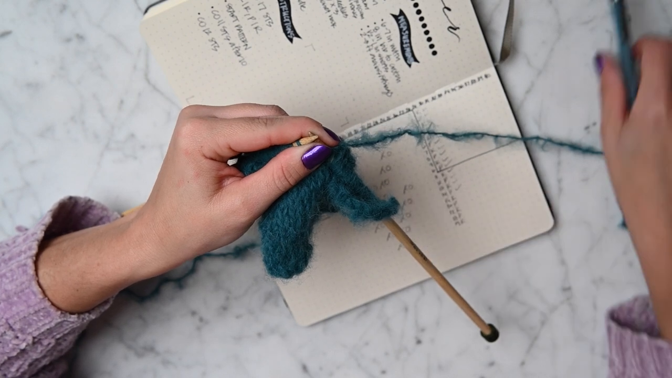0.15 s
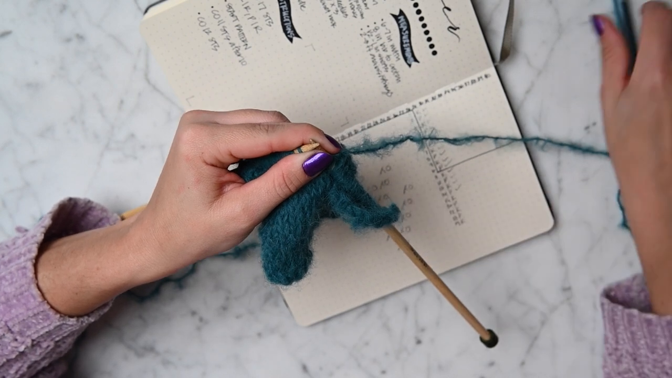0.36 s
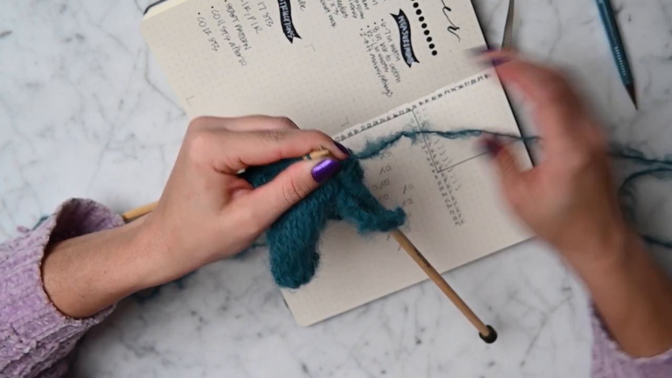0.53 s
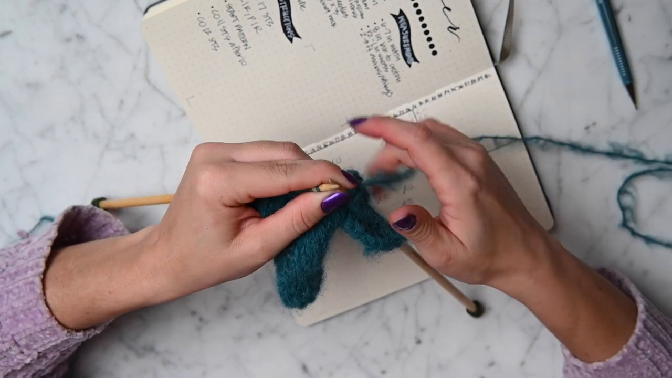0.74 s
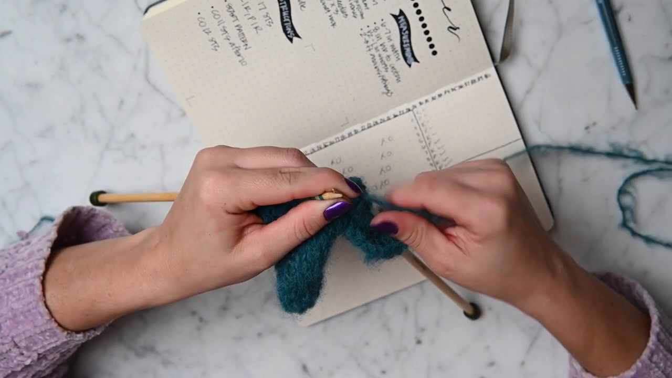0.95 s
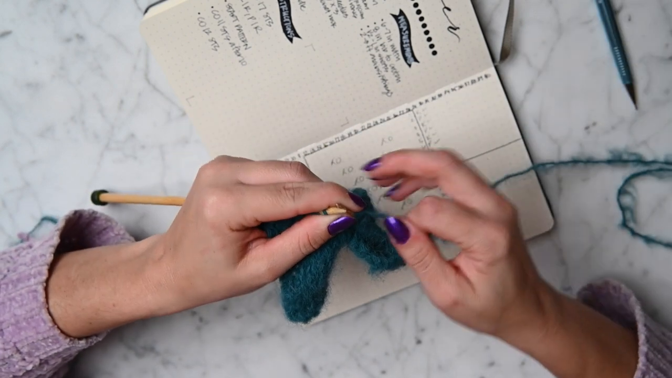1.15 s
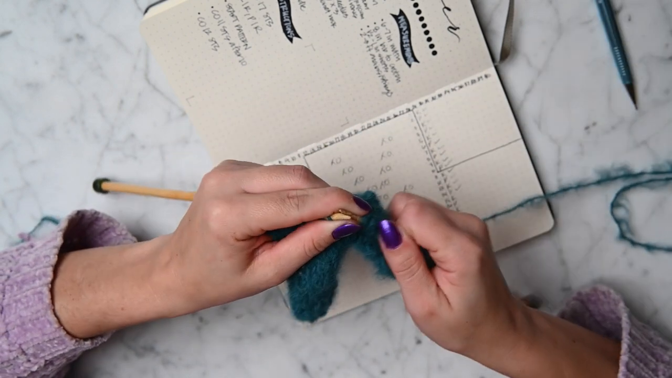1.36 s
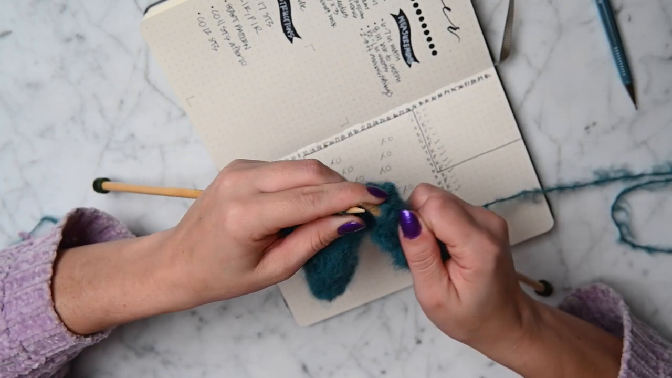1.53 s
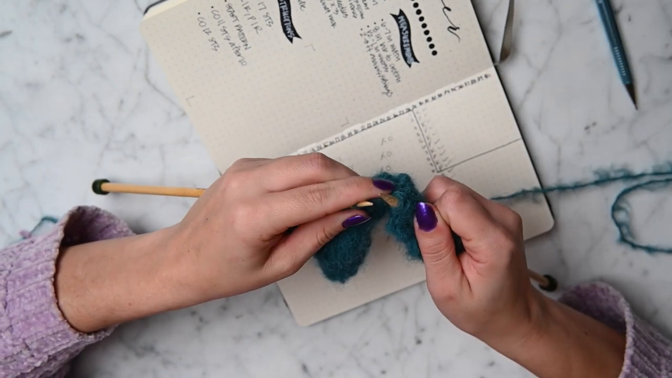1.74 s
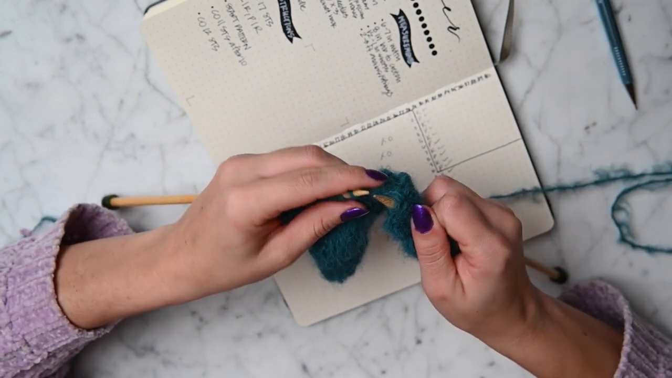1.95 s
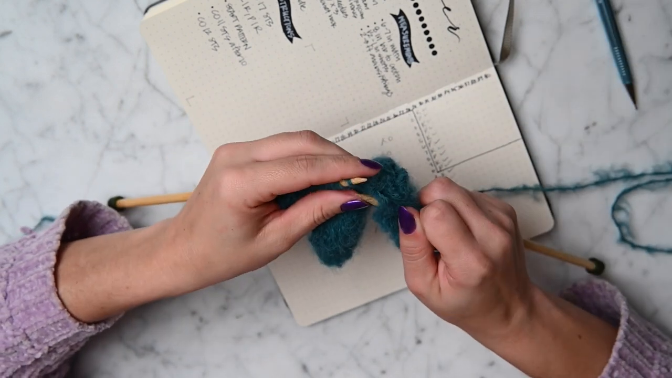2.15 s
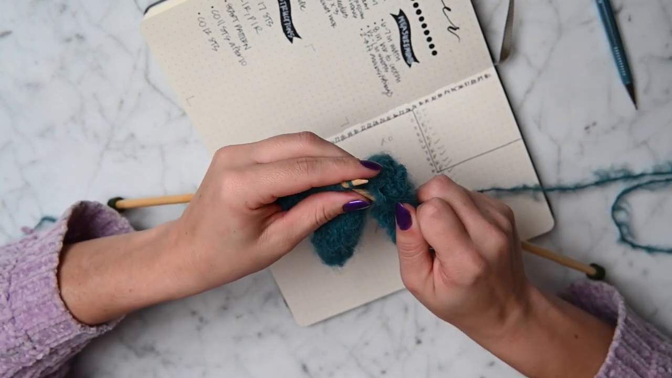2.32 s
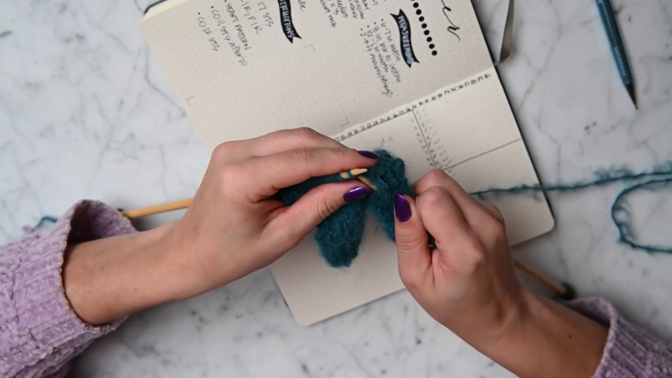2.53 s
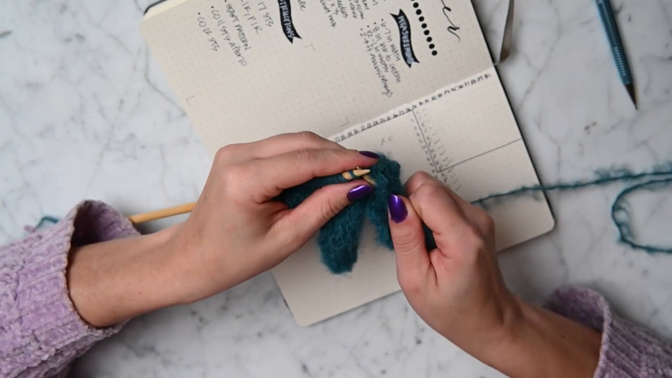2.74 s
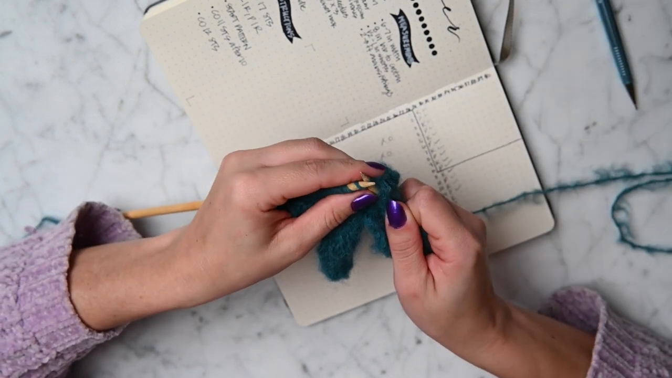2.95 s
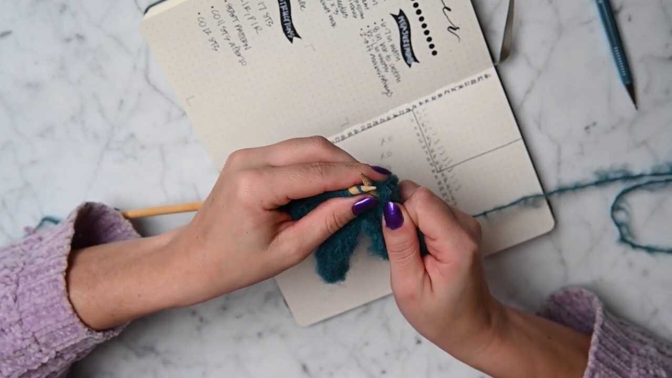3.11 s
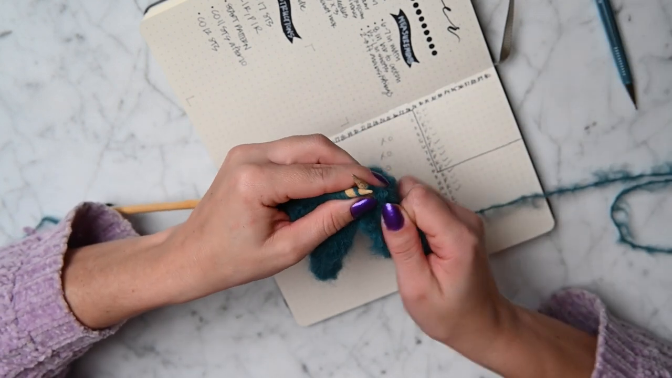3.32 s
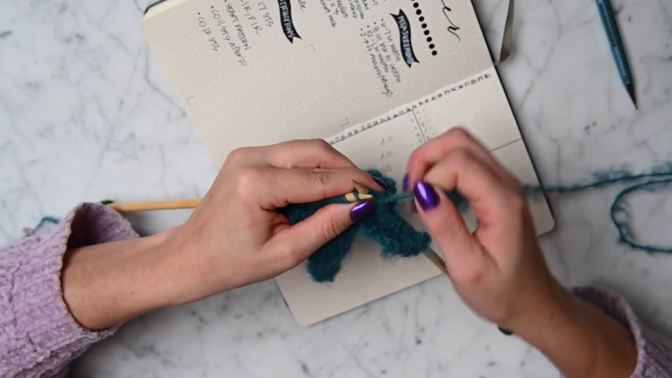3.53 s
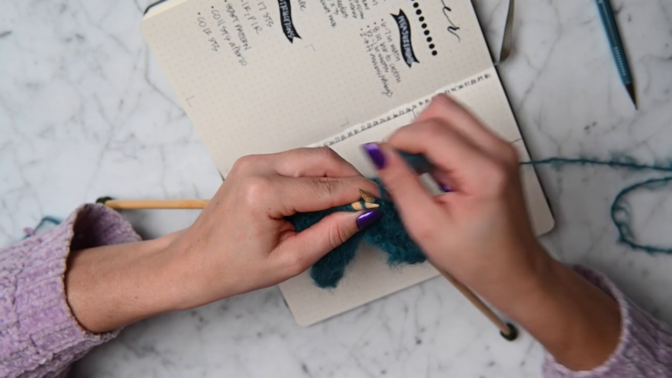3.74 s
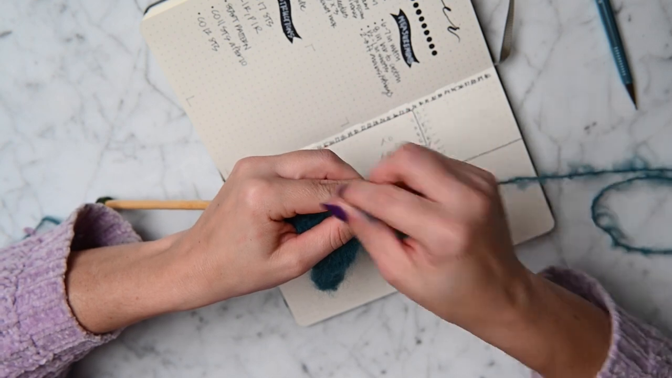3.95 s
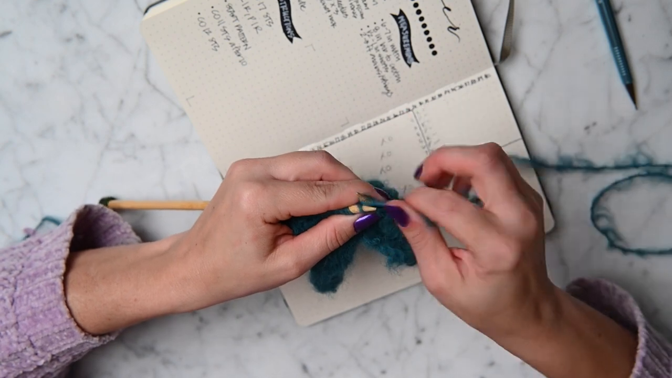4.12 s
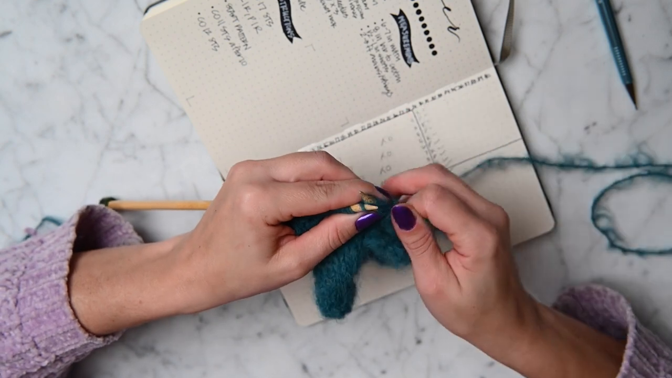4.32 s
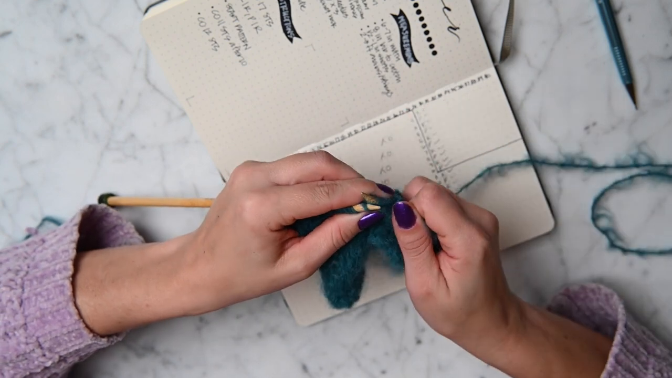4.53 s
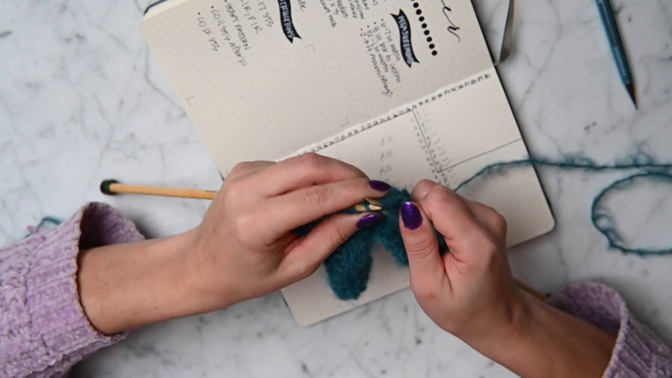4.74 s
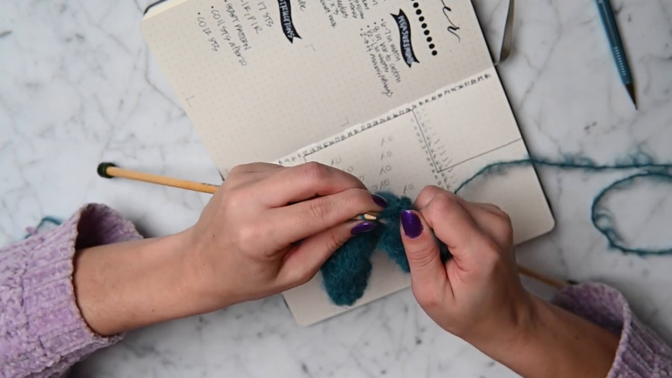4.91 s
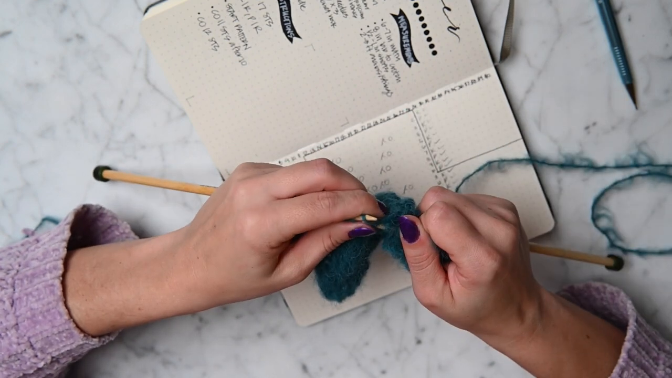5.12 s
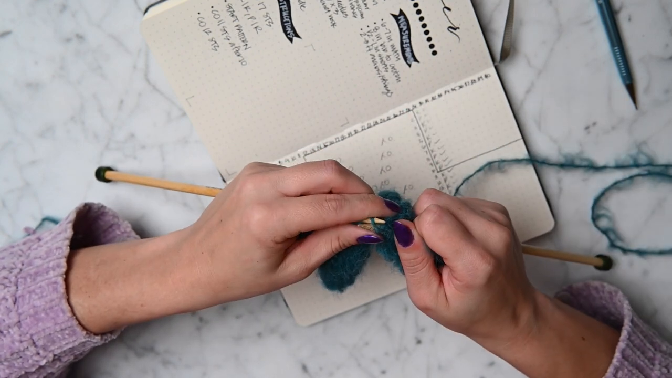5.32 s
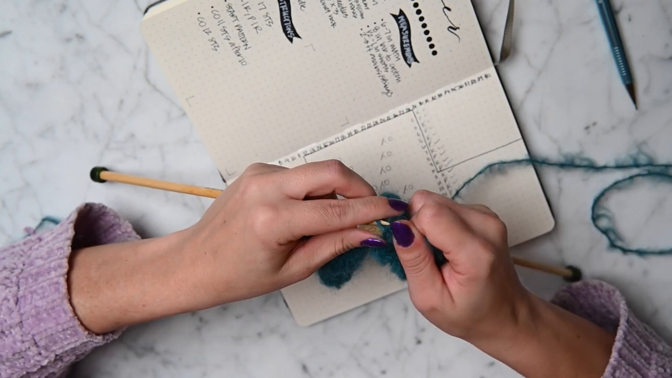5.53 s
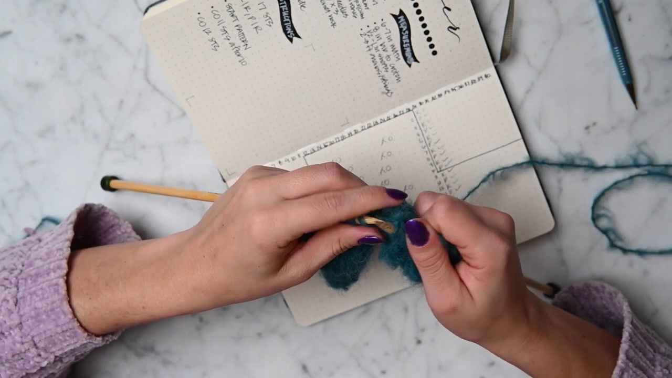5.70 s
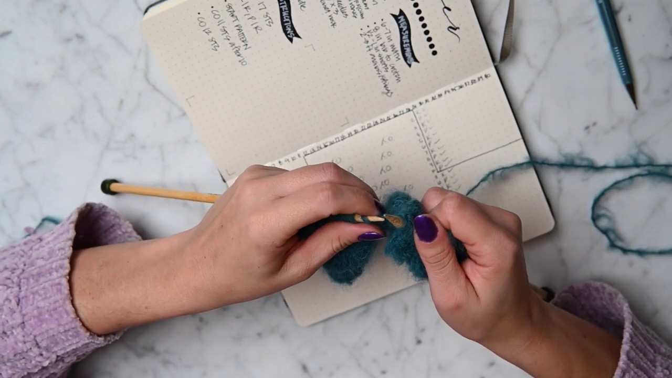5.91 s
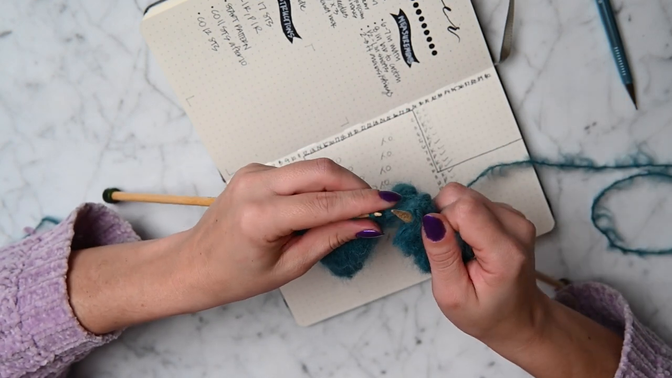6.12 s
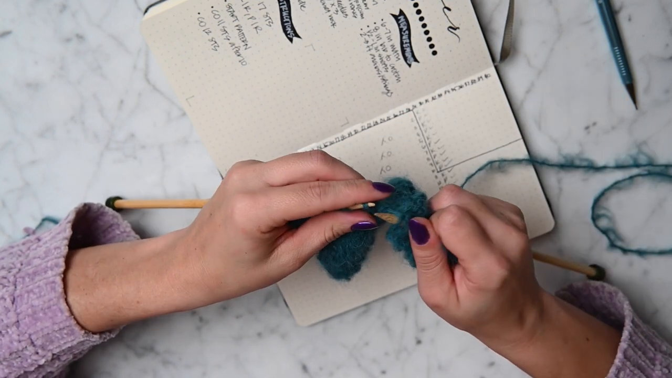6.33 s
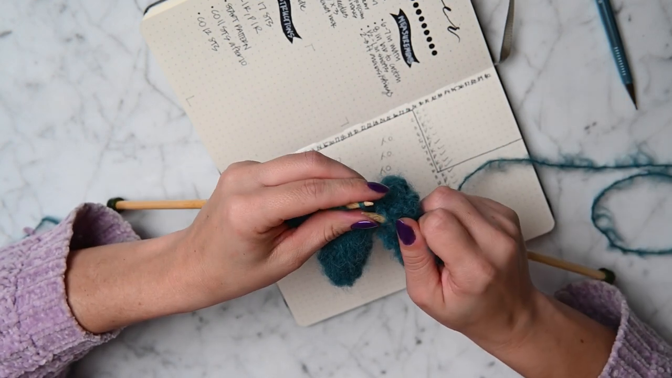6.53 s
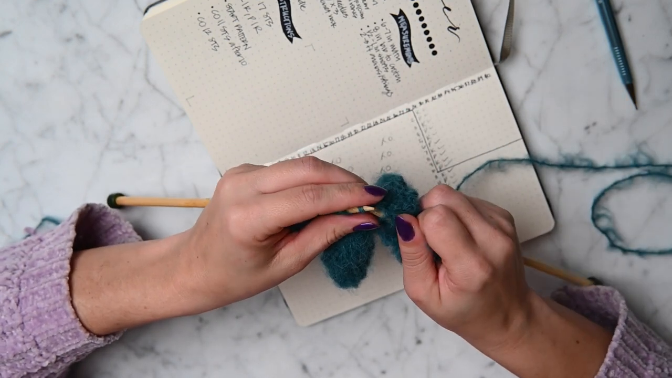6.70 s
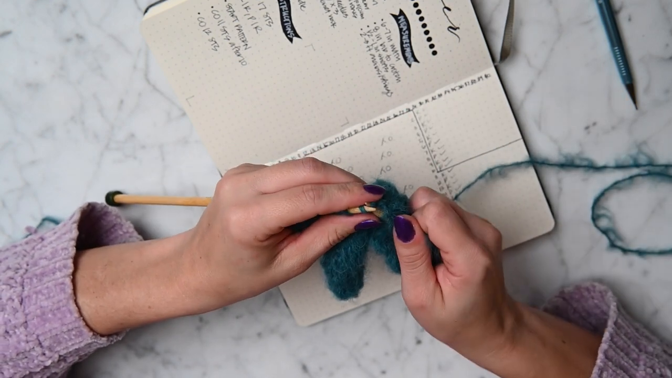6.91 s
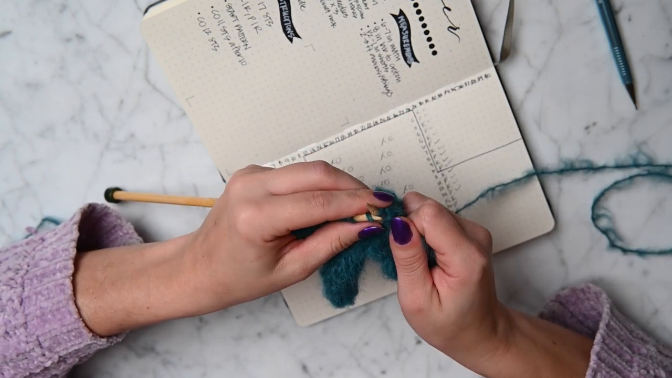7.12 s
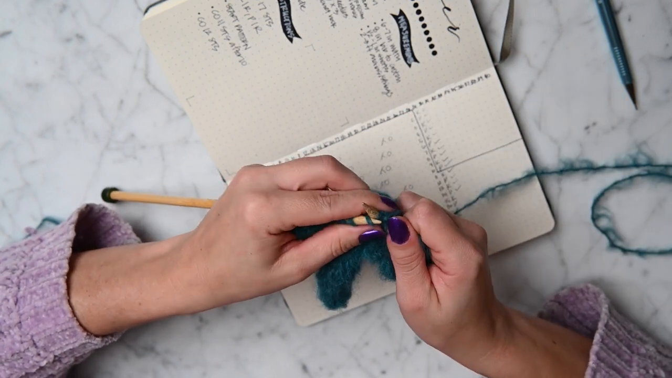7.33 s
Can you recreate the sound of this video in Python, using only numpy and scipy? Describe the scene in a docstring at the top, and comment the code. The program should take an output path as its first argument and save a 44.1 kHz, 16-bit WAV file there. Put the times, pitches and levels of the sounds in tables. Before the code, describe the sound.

Close, centred view of handwork at a table. First a pen clatters down, by far the loudest event, bouncing and chattering to rest within a fraction of a second. Then come isolated, small, dry wooden needle clicks with long gaps, some ringing slightly on the tabletop. Barely audible grainy wool hiss, tiny fibre snaps and soft cloth movement fill in. Steady faint hum, slightly wide airy hiss and gentle room reverberation surround everything.

```python
"""Knitting at a table in a quiet room. First a pen ticks and rustles in the fingers.
It is dropped on the table, and its knocks and a fading chatter of tiny touches ring barrel and table top.
Then wooden needles click as their ends knock on the table, each blow a crack plus ringing tones.
Between the clicks, grainy noise makes wool slide over the tips, a sleeve brush by and fabric rub.
Behind it all lie the steady and wavering tones of an appliance, soft air noise and the room's echo."""
import sys
import numpy as np
from scipy import signal
from scipy.fft import rfft, irfft
from scipy.io import wavfile

SR = 44100
rng = np.random.default_rng(int(sys.argv[2]) if len(sys.argv) > 2 else 0)


def waveform_to_disk(signal):
    """Save audio, clipped to [-1, 1], as 16-bit WAV at the path in sys.argv[1]."""
    frames = np.transpose(np.atleast_2d(signal))
    scaled = np.clip(frames, -1, 1) * 32767
    samples = np.round(scaled).astype(np.int16)
    wavfile.write(sys.argv[1], SR, samples)


N = 324576
TIME = np.arange(N) / SR

# Needle clicks. Each row: start in seconds, nominal peak in dB, table share in dB, main ring in Hz,
# its lift in dB, second ring in Hz, its lift in dB, table ring in Hz, its lift in dB.
NEEDLE_CLICKS = [(0.8156, -35.5, 0, 2310, 4, 3500, 5, 930, 8),
                 (0.9210, -38.5, 7.5, 2080, 11, 6800, 14, 1140, 3),
                 (1.8024, -33.5, 5, 2490, 5, 5830, 15, 490, 2), (2.141, -40, -1, 2700, 0, 5000, 4, 600, -1),
                 (2.9465, -34.5, 1, 3500, 7.5, 2050, -2, 1220, 6),
                 (3.3903, -48.5, -4, 1800, 7, 3000, 1, 800, -1), (3.3964, -49, 3, 2000, 2, 3000, 1, 800, 2),
                 (3.6389, -20.5, -1.5, 3400, 10.5, 7500, 4.5, 700, 8),
                 (3.6461, -45, -12, 7000, 4, 3400, 1, 700, 1),
                 (3.6511, -33, 3, 3420, 2, 7000, -5, 720, -10),
                 (3.6543, -39.5, -9, 7600, 6, 3420, 3, 720, -2),
                 (4.7259, -34, 1, 3400, 8, 5000, 6, 620, -3),
                 (5.5711, -27, 8, 2560, 9, 5100, 11.5, 660, 3.5),
                 (5.7289, -37, 5, 3300, 14, 4700, 14, 930, 13),
                 (6.2550, -46.5, 4, 1900, 6, 3400, 9, 603, 6), (6.9433, -33, 2, 2490, 5, 3950, 9, 690, 4)]
# Wooden needle tones. Each row: pitch in Hz, height of the resonance in dB, time to fade by 60 dB in seconds.
NEEDLE_TONES = [(1720, 8, 0.04), (2100, 14.5, 0.04), (2490, 15, 0.035), (2870, 10, 0.03), (3460, 15, 0.022),
                (3930, 8, 0.03), (4610, 9, 0.022), (5010, 6.5, 0.02), (5330, 6.5, 0.018), (5870, 5, 0.012),
                (6730, 10, 0.007), (7520, 12, 0.008)]
# Crack of a needle contact. Each row: frequency in Hz, relative level in dB per Hz.
NEEDLE_CRACK_SPECTRUM = [(120, -20), (280, -11), (450, 8), (1100, 0.5), (2500, 3.5), (5000, 1),
                         (8000, -2.5), (11000, -13), (16000, -18)]
# A harder click is a shorter contact and so brighter; a knock of the blunt knob on the table is duller.
USUAL_CLICK_DB, USUAL_BRIGHT_HZ = -32.5, 5500
PEAK_DB_PER_OCTAVE = 12    # dB of peak that raise the brightness by an octave
TABLE_DB_PER_OCTAVE = 7.5  # dB of table share that lower it by an octave

# The pen lands on one end, falls flat and rocks from end to end. Each row: start in seconds, nominal peak
# in dB, brightness in Hz, table share in dB, main ring in Hz, its lift in dB, second ring in Hz,
# its lift in dB, table ring in Hz, its lift in dB.
PEN_KNOCKS = [(0.3734, -26, 700, 8, 2000, 0, 1700, 0, 400, 3),
              (0.3746, -17.5, 14000, 1, 2920, 14.5, 4170, -17, 1340, 7),
              (0.3818, -24, 15000, -7, 11800, 1, 9300, 12, 480, 3),
              (0.3998, -37, 15000, -8, 7200, 15, 9300, 14, 1340, 2),
              (0.4146, -17, 4500, 12.5, 2480, 13, 3500, 2, 480, 2.5),
              (0.4156, -6.5, 5800, 4, 2500, 10.5, 4650, 4.5, 920, 8.5),
              (0.4222, -19, 12000, 12, 11800, 8, 4500, 10, 690, 13.5),
              (0.4271, -18.5, 15000, -4, 3650, 8, 11800, 11, 700, -9),
              (0.4294, -17.5, 7000, 7.5, 3700, 14, 2700, 0, 1340, 11),
              (0.4492, -21.5, 7000, 3, 1700, 22, 2340, -1, 1340, 5),
              (0.4659, -24.5, 9000, 5.5, 5200, 2, 7200, 8, 500, 9),
              (0.4815, -28.5, 9000, -2, 2330, 3, 3450, -5, 600, 3),
              (0.5062, -32, 12000, -5, 3500, 13, 2300, 3, 1250, 6),
              (0.5170, -32.5, 9000, -11, 5700, 17, 2300, 9, 920, 4)]
# Pen barrel tones. Each row: pitch in Hz, height of the resonance in dB, time to fade by 60 dB in seconds.
PEN_TONES = [(1680, 7, 0.035), (2300, 5, 0.02), (2484, 11, 0.022), (2700, 6, 0.014), (2900, 10, 0.016),
             (3450, 13, 0.028), (3700, 14, 0.016), (4490, 13, 0.014), (5250, 12, 0.014), (5700, -1, 0.04),
             (7190, 9, 0.025), (9250, 12, 0.035), (11750, 16, 0.016), (12400, 11, 0.008)]
# Crack of a pen contact. Each row: frequency in Hz, relative level in dB per Hz.
PEN_CRACK_SPECTRUM = [(70, -25), (195, -15), (245, 4.5), (450, 2.5), (1000, -3), (1800, 1), (2800, -5),
                      (5000, -5.5), (8000, -4.5), (12000, -1.5), (16000, -8)]
# Table top tones, rung by every blow. Each row: pitch in Hz, height of the resonance in dB,
# time to fade by 60 dB in seconds.
TABLE_TONES = [(243, 5, 0.16), (285, 1, 0.08), (325, 0, 0.07), (403, 0, 0.07), (485, 10, 0.1),
               (510, 5, 0.12), (625, 0, 0.06), (680, 12, 0.08), (807, 5, 0.09), (922, 10.5, 0.075),
               (1060, 3, 0.04), (1230, 7, 0.08), (1342, 13.5, 0.18), (1678, 5, 0.06)]
# The pen chatters once it lies flat: a quick rise, a steady fade, a stop as it comes to rest.
CHATTER_START_S, CHATTER_ATTACK_S, CHATTER_HOLD_S, CHATTER_RELEASE_S = 0.416, 0.0057, 0.13, 0.012
CHATTER_DB, CHATTER_FADE_DB_PER_S = -35.5, 183
# Small ticks of the pen in the hand. Each row: start in seconds, peak in dB, pitch in Hz.
PEN_TICKS = [(0.017, -47, 2530), (0.0415, -49, 14900)]
TICK_T60_S = 0.022  # time to fade by 60 dB
# Fingers shift their grip on the pen. Each row: middle in seconds, length in seconds, level in dB.
# All lengths of rubbing strokes run between the points about 4 dB below the middle.
GRIP_SHIFTS = [(0.108, 0.0089, -70), (0.17, 0.37, -63.5)]
# Rustle of the fingers. Each row: frequency in Hz, relative level in dB per Hz.
FINGER_SPECTRUM = [(250, -2), (650, 7.5), (1300, -7), (2600, -4.5), (5000, -12.5), (9000, -17),
                   (15000, -24)]

# A single loop is drawn over a tip. Each row: middle in seconds, length in seconds, nominal level in dB.
LOOP_SLIDES = [(4.662, 0.053, -64.5), (5.027, 0.018, -59.5), (5.227, 0.072, -67.5), (5.68, 0.063, -68),
               (7.265, 0.033, -64.5)]
# Stitches are pushed along the needle in an even run of short shoves.
SHOVE_START_S, SHOVE_EVERY_S, SHOVE_LENGTH_S, SHOVE_DB = 2.70, 0.177, 0.073, -66
# Fibres snapping off a tip. Each row: start in seconds, nominal peak in dB.
FIBRE_SNAPS = [(2.764, -43.5), (3.201, -48), (3.39, -44.5), (5.023, -47), (5.6876, -39)]
# Hiss of wool on wood. Each row: frequency in Hz, relative level in dB per Hz.
WOOL_SPECTRUM = [(1000, -39), (3000, -12.5), (5500, -15), (7000, -4), (8400, 0.5), (10000, -5.5),
                 (13000, -8), (16000, -12)]
# The sleeve brushes as the arm moves. Each row: middle in seconds, length in seconds, level in dB.
SLEEVE_BRUSHES = [(3.41, 0.048, -69), (3.82, 0.13, -64.5), (4.12, 0.16, -69.5)]
# Brushing cloth. Each row: frequency in Hz, relative level in dB per Hz.
SLEEVE_SPECTRUM = [(300, -23), (700, -10), (1300, -7), (1850, 3.5), (2400, -11), (3600, -9), (6000, -13),
                   (12000, -32)]
# The knitted piece rubs as it is turned. Each row: middle in seconds, length in seconds, level in dB.
FABRIC_TURNS = [(2.08, 0.25, -64), (4.6, 0.57, -65), (6.9, 0.18, -71)]
# Dull rub of the knitted piece. Each row: frequency in Hz, relative level in dB per Hz.
FABRIC_SPECTRUM = [(200, -35), (400, -9), (560, -4.5), (800, -15.5), (1500, -24), (5000, -31)]

# Appliance tones. Each row: pitch in Hz, level in dB rms, wavering share from 0 to 1, waver rate in Hz.
HUM_TONES = [(58.5, -80.5, 0.6, 4.6), (102, -79, 0, 2), (120, -76.5, 0.1, 3.7), (266, -74.5, 0.1, 4.6),
             (404, -69.5, 0.65, 3), (210, -78, 1, 6.1), (388, -74, 1, 9), (431, -71, 1, 8),
             (1211, -82, 1, 3.9)]
# Air noise of the room and microphone hiss. Each row: frequency in Hz, relative level in dB per Hz.
AIR_SPECTRUM = [(25, -12), (45, -30), (85, -19), (150, -6), (240, -2), (310, -2), (390, 3), (490, -0.5),
                (620, -4.5), (1000, -10), (1900, -13), (3500, -16), (9000, -16), (16000, -18.5)]
AIR_DB = -60.5  # rms of the part shared by left and right
# Spread of the air noise. Each row: frequency in Hz, level of the left-right difference part
# against the shared part in dB.
AIR_WIDTH = [(60, -6), (300, -24), (1000, -9.5), (3000, -4), (8000, -4), (15000, -3.5)]
# How long the room rings. Each row: frequency in Hz, time to fade by 60 dB in seconds.
ROOM_FADE = [(200, 0.7), (1000, 0.9), (3000, 0.42), (7000, 0.58), (14000, 0.37)]
CUTOFF_HZ = 16000


def needle_contacts():
    """The harder a needle hits, the brighter the click; the more it is a knock on the table, the duller."""
    contacts = []
    for s, peak_db, table_db, *rings in NEEDLE_CLICKS:
        octaves = (peak_db - USUAL_CLICK_DB) / PEAK_DB_PER_OCTAVE - table_db / TABLE_DB_PER_OCTAVE
        contacts.append((s, peak_db, USUAL_BRIGHT_HZ * 2 ** octaves, table_db, *rings))
    return contacts


def needles():
    """Wooden needles click: each contact rings the needle and the table top."""
    return blows(needle_contacts(), NEEDLE_TONES, NEEDLE_CRACK_SPECTRUM, grit_db=6.0, grit_t60=0.053,
                 travel_s=0.00035, round_trip_s=0.0006, reflected=0.56, crest_db=12.0)


def pen_drop():
    """The falling pen knocks on the table: each contact rings the barrel and the table top."""
    return blows(PEN_KNOCKS, PEN_TONES, PEN_CRACK_SPECTRUM, grit_db=6.5, grit_t60=0.03,
                 travel_s=0.00025, round_trip_s=0.000403, reflected=0.4, crest_db=12.5)


def blows(rows, tones, crack, grit_db, grit_t60, travel_s, round_trip_s, reflected, crest_db):
    """Each blow cracks and rings both the object and the table; a softer contact is duller."""
    out, t = np.zeros(N), TIME[:SR // 3]
    click = pulse(crack, len(t))
    for (s, peak_db, bright_hz, table_db, ring_hz, ring_db, second_hz, second_db,
         table_hz, table_lift_db) in rows:
        # grit: countless weak tones, too dense to tell apart
        fading_noise = rng.standard_normal(len(t)) * dying(t, grit_t60)
        grit = rms_one(signal.fftconvolve(click, fading_noise)[:len(t)])
        grit *= from_db(grit_db) * np.std(click)
        body = ringing(tones, t, scatter_db=0.5, favoured=[(ring_hz, ring_db), (second_hz, second_db)])
        table_ring = ringing(TABLE_TONES, t, scatter_db=1.0, favoured=[(table_hz, table_lift_db)])
        table = signal.fftconvolve(click, table_ring)[:len(t)]
        shaft = dispersed(click + grit + body, travel_s, round_trip_s, reflected)
        softness = signal.butter(2, [170, bright_hz], "band", fs=SR, output="sos")
        sound = signal.sosfilt(softness, shaft + from_db(table_db) * table)
        # set the level of the first 4 ms, a fixed step (crest_db) below the nominal peak
        add(out, s, from_db(peak_db - crest_db) * sound / np.std(sound[:SR // 250]))
    return out


def ringing(tones, t, scatter_db, favoured):
    """Tones that die away; the place of the blow lifts those near the favoured (Hz, dB) pitches."""
    hz, height_db, t60 = np.transpose(tones)[:, :, None]
    lift_db = 0
    for near_hz, db in favoured:
        lift_db = lift_db + db * np.exp(-0.5 * (5.5 * np.log2(hz / near_hz)) ** 2)
    height = from_db(height_db + lift_db + scatter_db * rng.standard_normal(hz.shape))
    # a resonance of given height starts quieter the longer it rings
    strength = height * 2 * np.log(1000) / (t60 * SR)
    return np.sum(strength * np.cos(2 * np.pi * hz * t) * dying(t, t60), axis=0)


def dispersed(sound, travel_s, round_trip_s, reflected):
    """Bending waves carry treble faster and run to and fro along the shaft; both times hold at 1 kHz."""
    size = 2 * len(sound)
    bending = -4j * np.pi * np.sqrt(1000 * np.fft.rfftfreq(size, 1 / SR))
    trip = np.exp(bending * round_trip_s)
    # each of the two ends is all-pass: it delays the pitches but keeps their levels
    ends = ((trip - reflected) / (1 - reflected * trip)) ** 2
    return irfft(rfft(sound, size) * np.exp(bending * travel_s) * ends, size)[:len(sound)]


def chatter(touches_per_s, barrel_db, rough_db):
    """Cap and barrel buzz on the table in many tiny, uneven touches, each ringing the barrel a little."""
    touches = random_touches(touches_per_s)
    t = TIME[:SR // 20]
    age = np.maximum(TIME - CHATTER_START_S, 0)
    corners = np.cumsum([0, CHATTER_ATTACK_S, CHATTER_HOLD_S, CHATTER_RELEASE_S])
    moving = np.interp(age, corners, [0, 1, 1, 0])
    level_db = CHATTER_DB - CHATTER_FADE_DB_PER_S * age + rough_db * drift(150)
    force = moving * from_db(level_db) * rms_one(touches)
    barrel = from_db(barrel_db) * ringing(PEN_TONES, t, scatter_db=0.5, favoured=[])
    touch = pulse(PEN_CRACK_SPECTRUM, len(t)) + barrel
    return signal.fftconvolve(force, touch / np.linalg.norm(touch))[:N]


def handling(rough_db):
    """The pen ticks and rustles in the fingers before it is let go."""
    out = strokes(GRIP_SHIFTS) * noise(FINGER_SPECTRUM, N) * from_db(rough_db * drift(60))
    t = TIME[:SR // 10]
    for s, peak_db, hz in PEN_TICKS:
        add(out, s, from_db(peak_db) * np.sin(2 * np.pi * hz * t) * dying(t, TICK_T60_S))
    return out


def wool(grains_per_s, grain_db, hiss_db, snap_t60, snap_db):
    """Fibres catch and slip on the wood: a grainy hiss with a few sharper snaps."""
    grains = rms_one(colour(random_touches(grains_per_s), WOOL_SPECTRUM))
    rub = from_db(grain_db) * grains + from_db(hiss_db) * noise(WOOL_SPECTRUM, N)
    out = rub * strokes([*shoves(count=5), *LOOP_SLIDES])
    t = TIME[:SR // 50]
    for s, peak_db in FIBRE_SNAPS:
        add(out, s, from_db(peak_db + snap_db) * noise(WOOL_SPECTRUM, len(t)) * dying(t, snap_t60))
    return out


def shoves(count):
    """Evenly paced strokes move the stitches up to the tip."""
    return [(SHOVE_START_S + k * SHOVE_EVERY_S, SHOVE_LENGTH_S, SHOVE_DB) for k in range(count)]


def sleeve(rough_db):
    """Knitted cloth drags unevenly: noise with a flickering level."""
    return strokes(SLEEVE_BRUSHES) * noise(SLEEVE_SPECTRUM, N) * from_db(rough_db * drift(40))


def fabric(rough_db):
    """Soft knitting rubs dully against the fingers: noise with an uneven level."""
    return strokes(FABRIC_TURNS) * noise(FABRIC_SPECTRUM, N) * from_db(rough_db * drift(25))


def hum():
    """An appliance hums: steady motor lines and wavering fan tones."""
    out = np.zeros(N)
    for hz, db, share, rate_hz in HUM_TONES:
        waver = drift(rate_hz) + 1j * drift(rate_hz)  # changes both loudness and phase
        swing = np.sqrt(2 * (1 - share ** 2)) + share * waver
        out += from_db(db) * np.real(swing * np.exp(2j * np.pi * (hz * TIME + rng.random())))
    return out


def air():
    """Air noise and hiss: a steady coloured noise."""
    return from_db(AIR_DB) * noise(AIR_SPECTRUM, N)


def room_response(echo_s, echo_db, echo_t60, tail_db):
    """A scattered echo from the nearest wall, and a tail whose fading time depends on pitch."""
    t, edges = TIME[:SR * 3 // 4], np.geomspace(180, 16000, 9)
    tail = np.zeros(len(t))
    for low, high in zip(edges, edges[1:]):
        band_filter = signal.butter(2, [low, high], "band", fs=SR, output="sos")
        band = signal.sosfilt(band_filter, rng.standard_normal(len(t)))
        tail += band * dying(t, at_hz(ROOM_FADE, np.sqrt(low * high))) * (t > 0.004)
    echo = rng.standard_normal(len(t)) * (t > echo_s) * dying(np.abs(t - echo_s), echo_t60)
    return from_db(echo_db) * echo / np.linalg.norm(echo) + from_db(tail_db) * tail / np.linalg.norm(tail)


def room(x, tail_db):
    """The walls send back every sound as an echo and a tail."""
    response = room_response(echo_s=0.01, echo_db=-27.0, echo_t60=0.032, tail_db=tail_db)
    return signal.fftconvolve(x, response)[:N]


def strokes(rows):
    """Bell-shaped swells of rubbing speed."""
    return sum(from_db(db) * np.exp(-2 * ((TIME - s) / length) ** 2) for s, length, db in rows)


def random_touches(per_s):
    """Tiny touches of random time and strength."""
    return (rng.random(N) < per_s / SR) * rng.standard_normal(N)


def pulse(spectrum, size):
    """The click with a given spectrum whose energy comes as early as possible (minimum phase)."""
    gain = from_db(at_hz(spectrum, np.fft.rfftfreq(size, 1 / SR)))
    cepstrum = irfft(np.log(gain), size)
    fold = 1 + np.sign(np.fft.fftfreq(size))
    return irfft(np.exp(rfft(cepstrum * fold)), size)


def noise(spectrum, size):
    """Coloured noise of unit power."""
    return rms_one(colour(rng.standard_normal(size), spectrum))


def colour(x, spectrum):
    """Give a sound the colour of a spectrum."""
    size = len(x)
    gain = from_db(at_hz(spectrum, np.fft.rfftfreq(size, 1 / SR)))
    return irfft(rfft(x) * gain, size)


def at_hz(points, hz):
    """Read a table of points on a log-frequency axis."""
    freqs, values = np.transpose(points)
    return np.interp(np.log(np.maximum(hz, 1)), np.log(freqs), values)


def drift(rate_hz):
    """Slow random wandering of spread 1."""
    hz = np.fft.rfftfreq(N, 1 / SR)
    return rms_one(irfft(rfft(rng.standard_normal(N)) / (1 + (hz / rate_hz) ** 2), N))


def dying(t, t60):
    """Exponential decay by 60 dB in t60 seconds."""
    return np.exp(-np.log(1000) * t / t60)


def rms_one(x):
    """Scale to unit power."""
    return x / np.sqrt(np.mean(x ** 2) + 1e-20)


def from_db(db):
    """Decibels to gain."""
    return 10 ** (np.asarray(db) / 20)


def add(track, s, sound):
    """Mix a short sound in at a time in seconds."""
    start = int(round(s * SR))
    track[start:start + len(sound)] += sound[:N - start]


def scene():
    """Hands and pen are heard straight ahead; only the air noise differs between left and right."""
    hands = needles() + sleeve(rough_db=2.0) + fabric(rough_db=1.5)
    hands += wool(grains_per_s=300, grain_db=-1.5, hiss_db=-4.0, snap_t60=0.017, snap_db=-9.0)
    pen = pen_drop() + handling(rough_db=3.0)
    pen += chatter(touches_per_s=1500, barrel_db=-14.0, rough_db=3.0)
    mid = hands + room(hands, tail_db=-15.0) + pen + room(pen, tail_db=-14.0)
    mid += hum() + air()
    side = colour(air(), AIR_WIDTH)
    return np.array([mid + side, mid - side])


def record(dry):
    """The treble is cut steeply above the cutoff."""
    return signal.sosfilt(signal.ellip(12, 0.1, 70, CUTOFF_HZ, fs=SR, output="sos"), dry)


dry = scene()
out = record(dry)
waveform_to_disk(out)
```